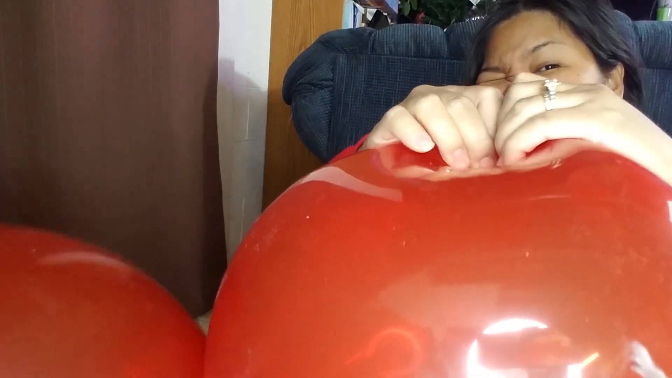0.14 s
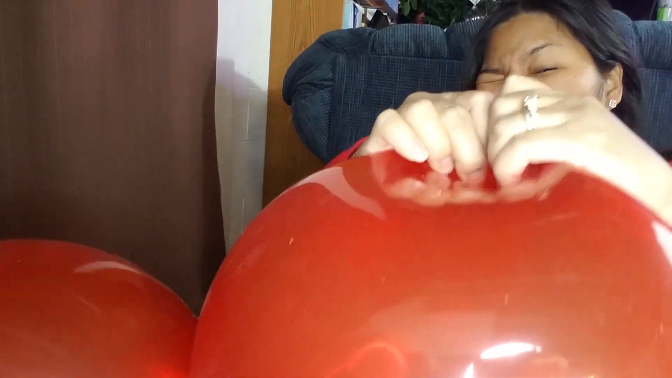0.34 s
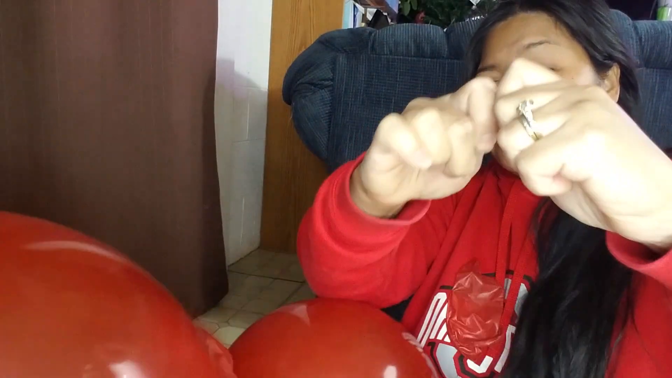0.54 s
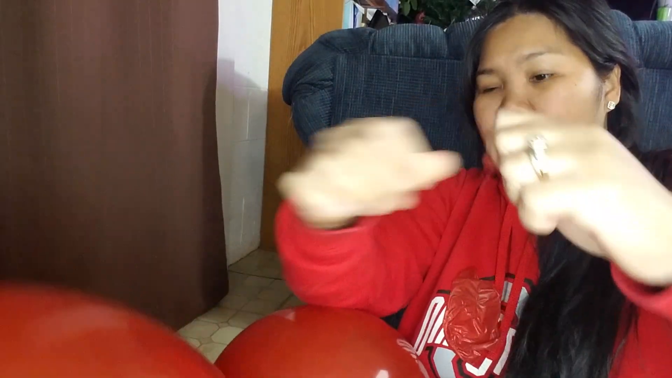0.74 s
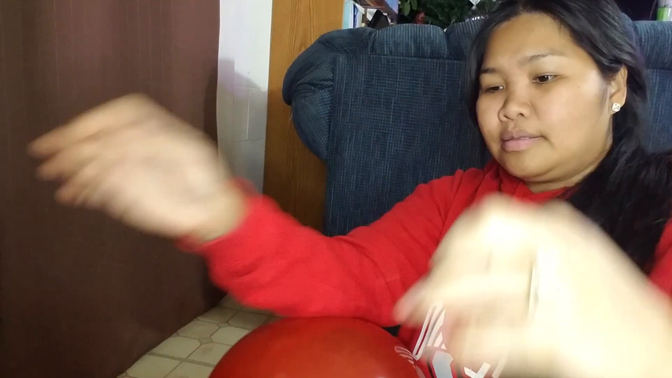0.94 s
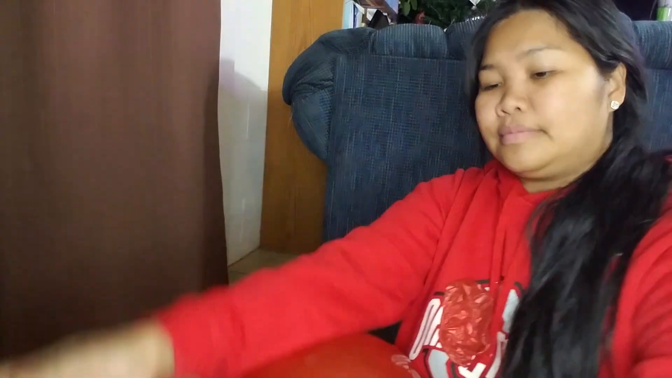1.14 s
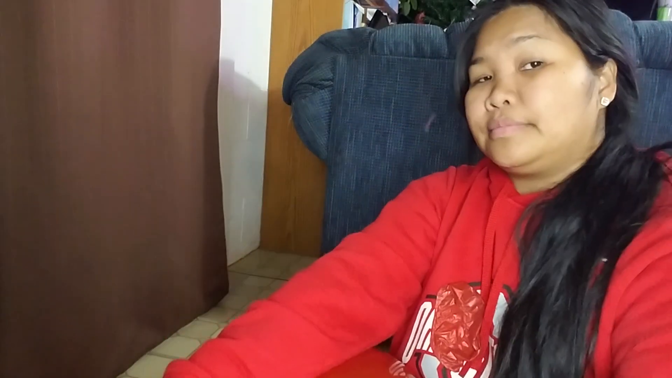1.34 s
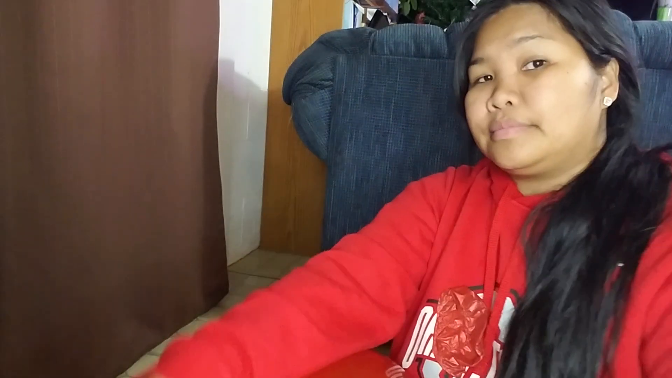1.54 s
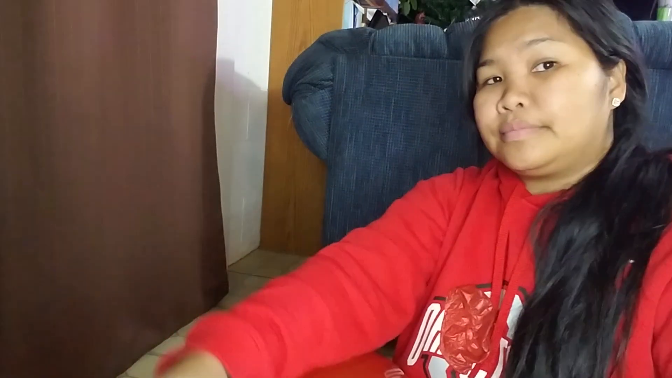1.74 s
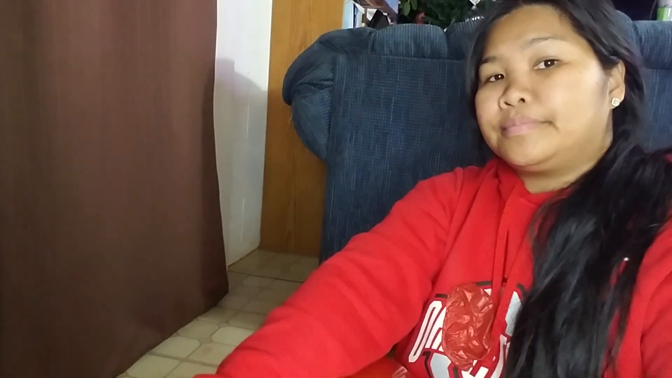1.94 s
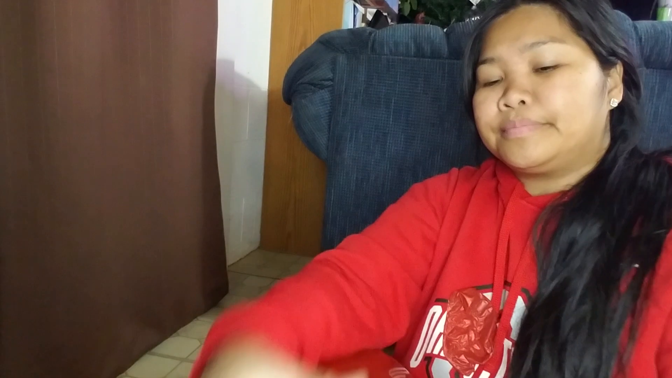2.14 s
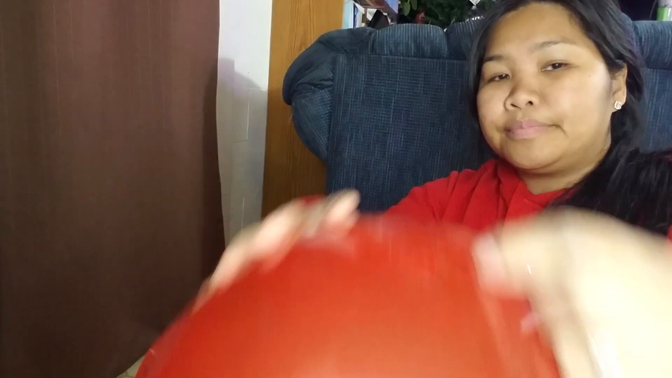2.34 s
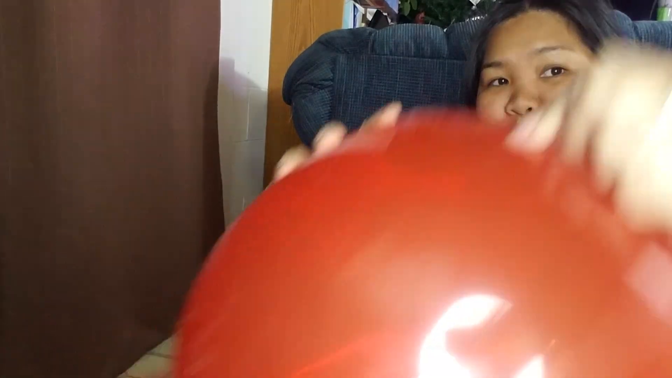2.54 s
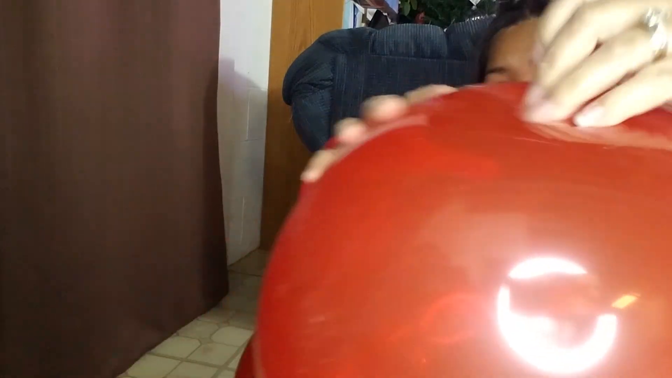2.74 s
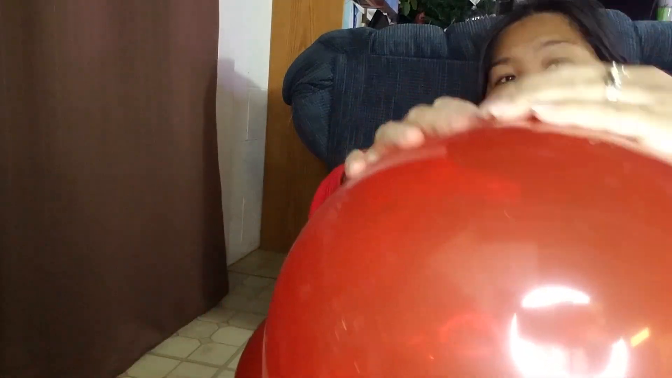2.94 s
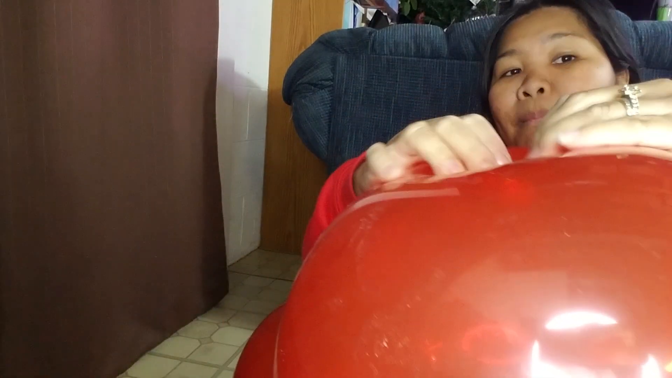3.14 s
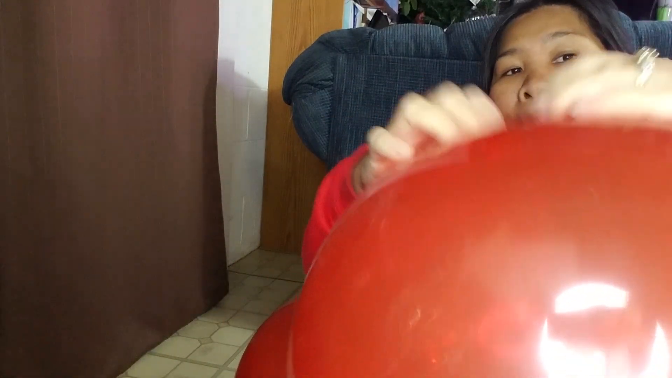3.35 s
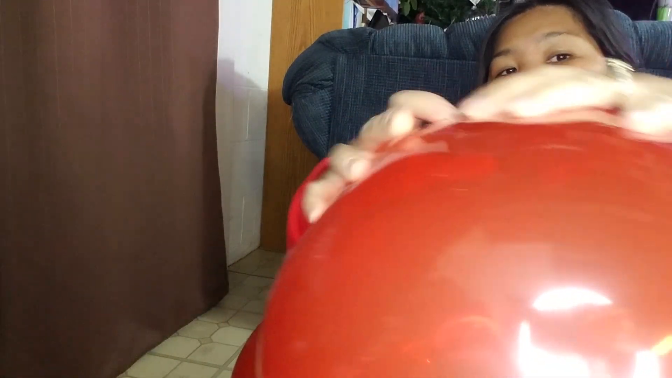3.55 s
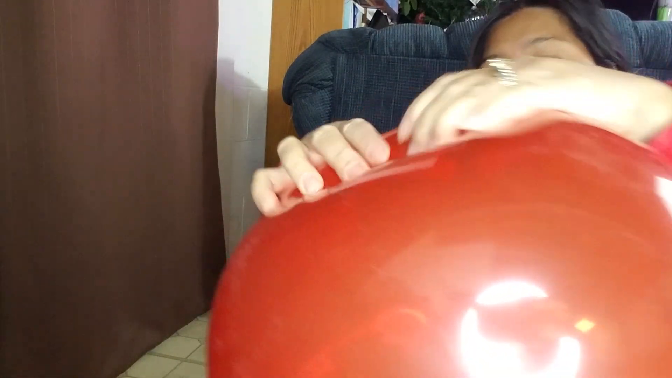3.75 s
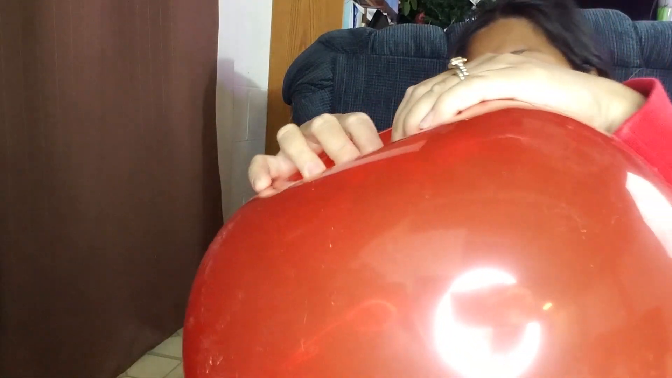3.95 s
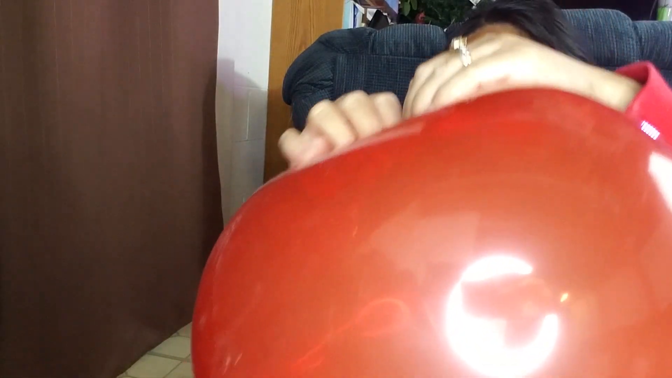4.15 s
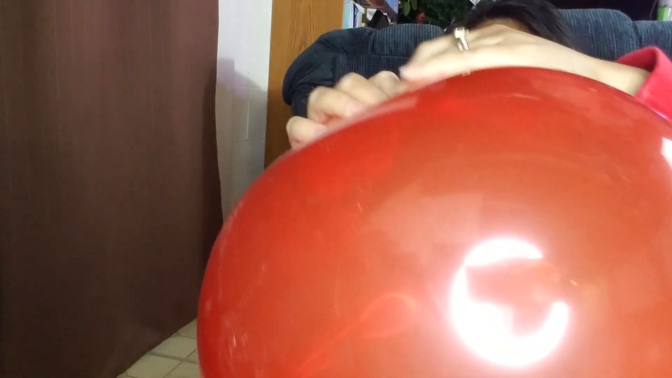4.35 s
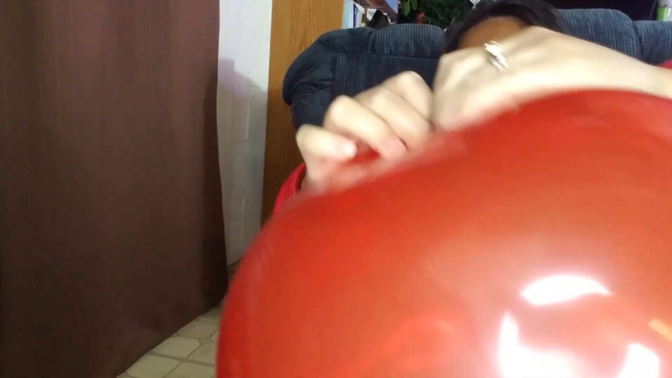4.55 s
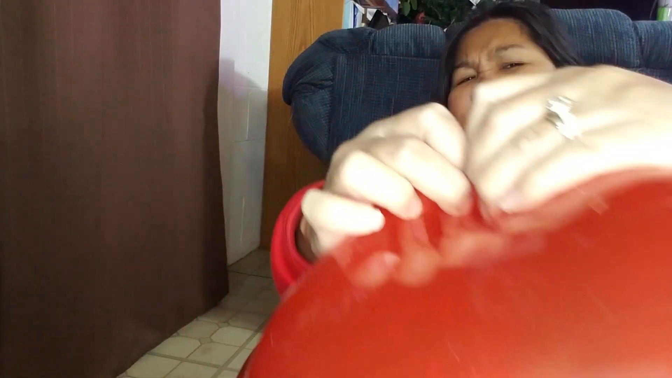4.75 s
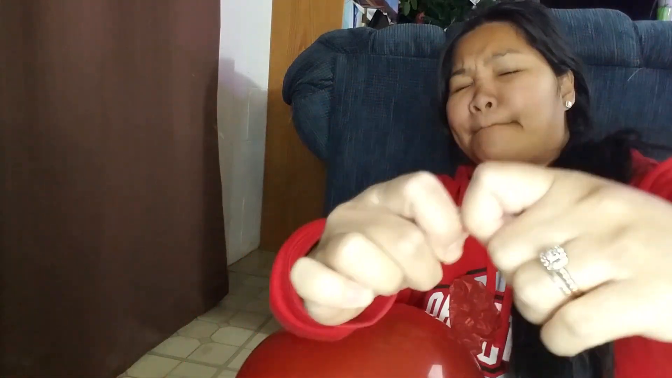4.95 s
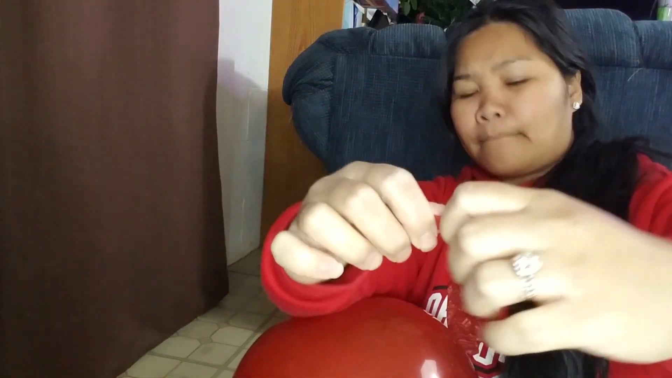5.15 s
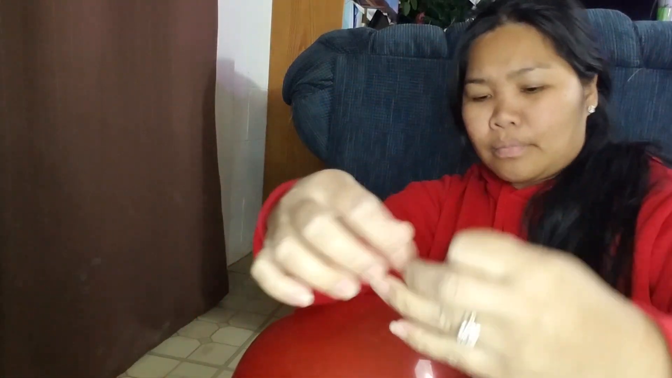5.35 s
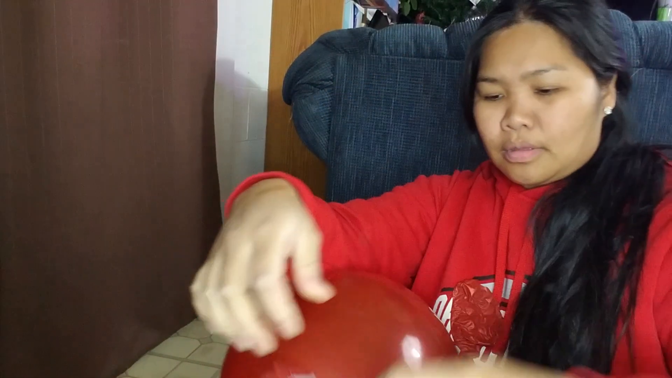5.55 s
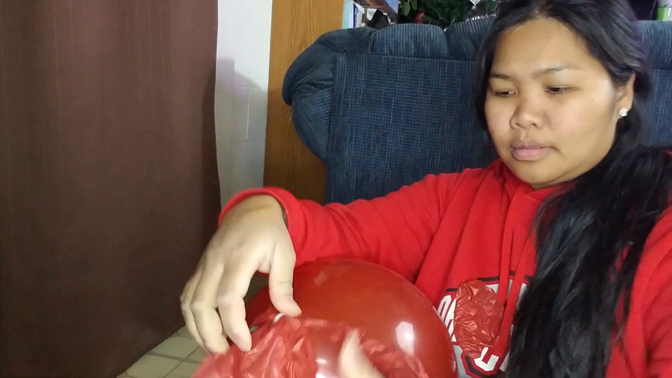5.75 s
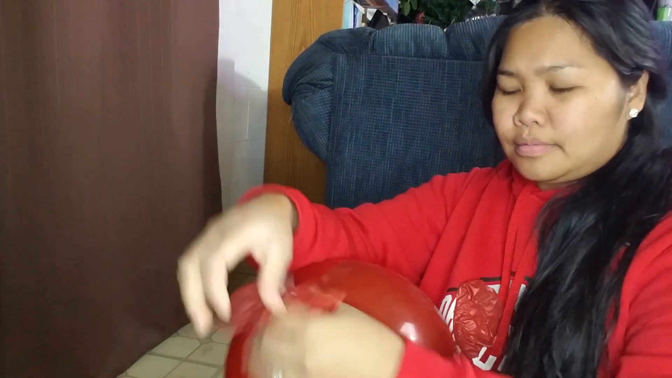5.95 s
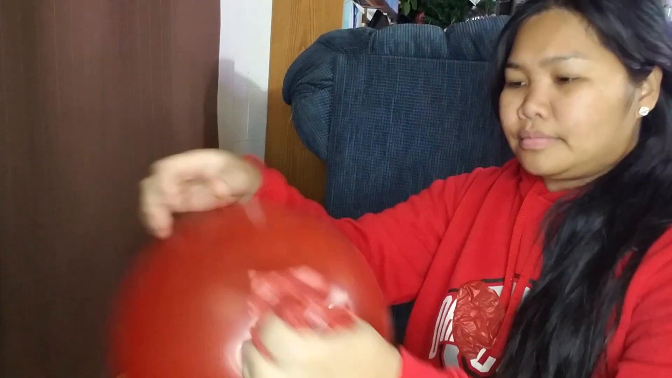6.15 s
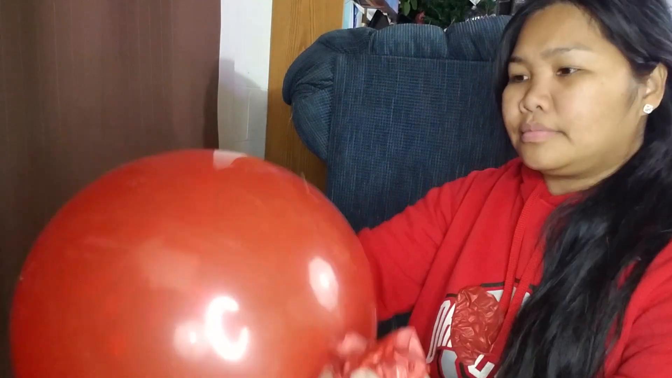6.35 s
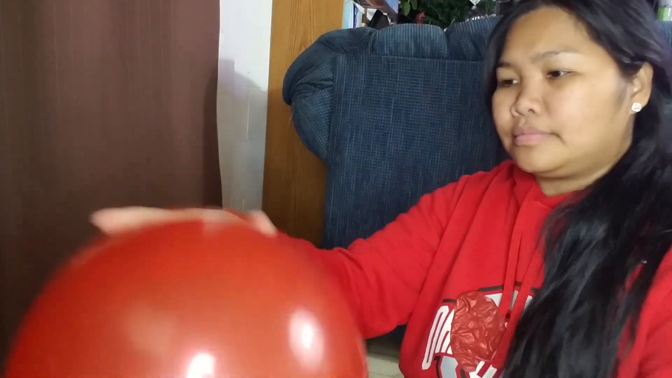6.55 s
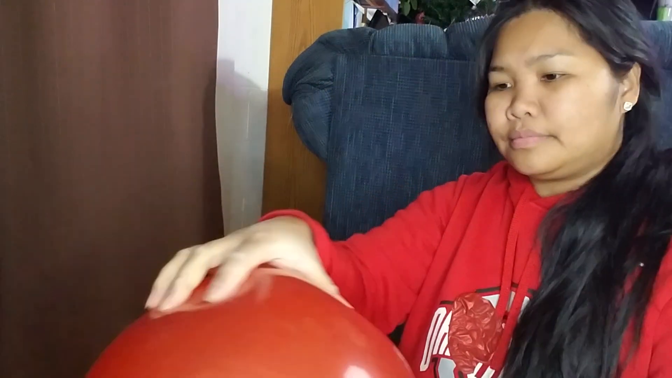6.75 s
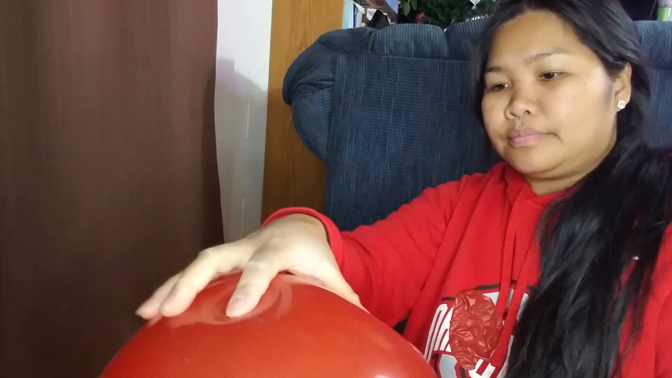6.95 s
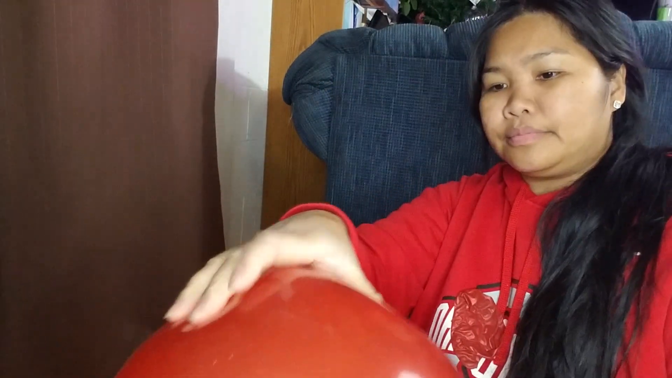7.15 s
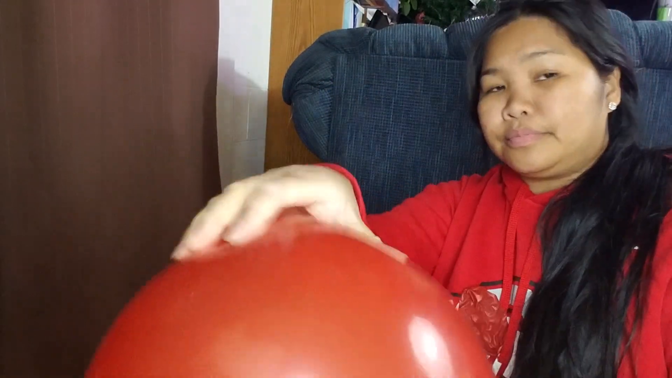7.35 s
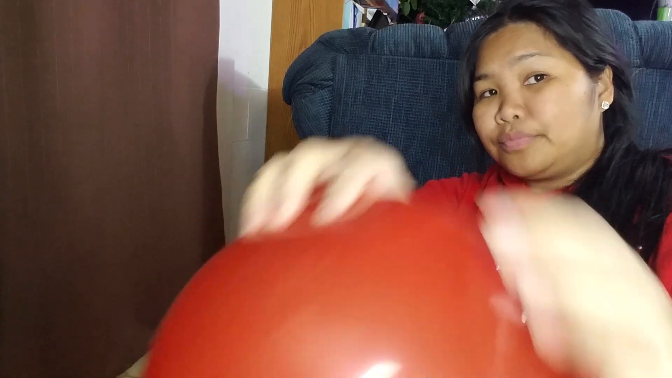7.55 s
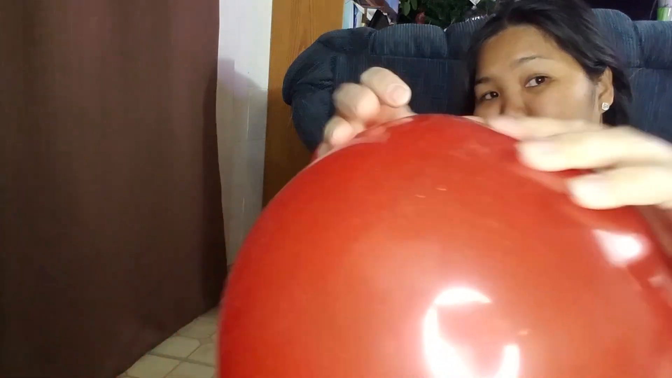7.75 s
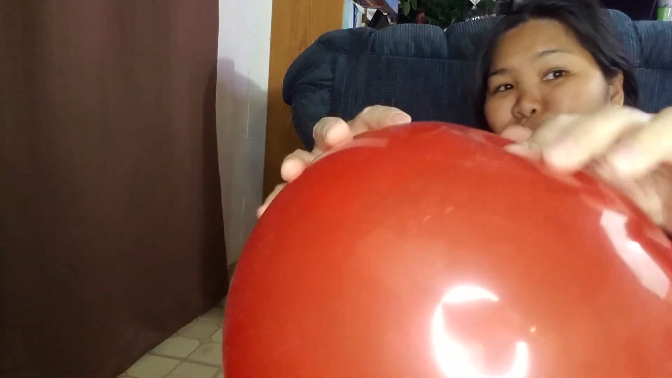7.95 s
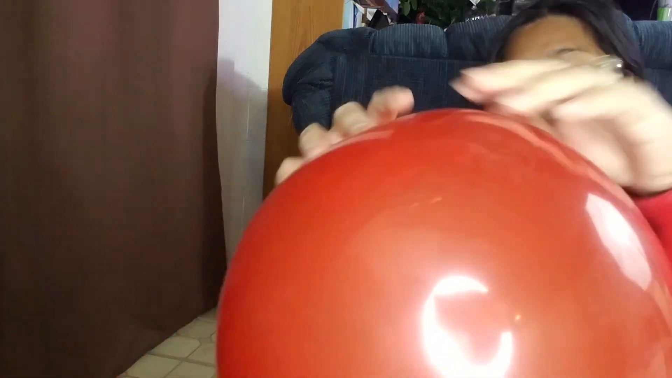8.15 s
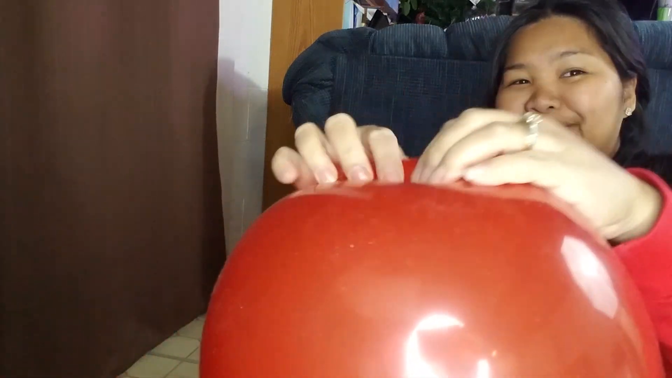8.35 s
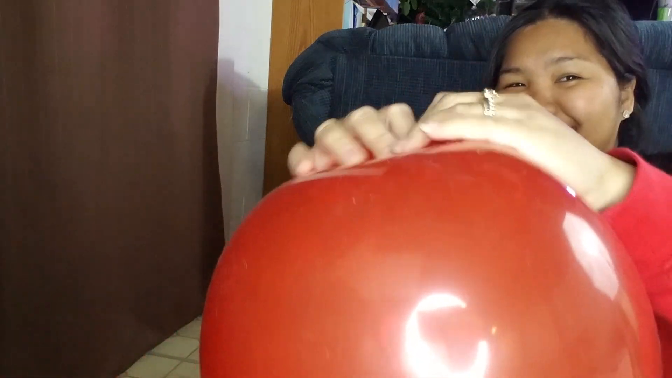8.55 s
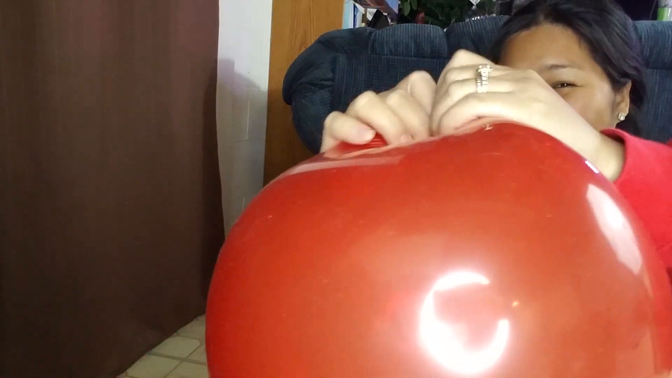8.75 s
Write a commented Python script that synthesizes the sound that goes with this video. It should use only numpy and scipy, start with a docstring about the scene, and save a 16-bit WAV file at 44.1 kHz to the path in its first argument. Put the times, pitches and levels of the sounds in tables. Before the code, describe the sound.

Stuttering high latex squeaks lead straight to a loud pop, with bassy wind on the right side afterwards. Soft rubbing grows into fierce scraping and ticking, eases into creaks, and ends in a second, boomier bang. Following a lull, palms drum and rub a new balloon, with sharp snaps. Close phone pickup, short room tail, faint hum.

```python
"""Taut latex balloons squeak, tick and rumble under rubbing, digging hands; two balloons burst.
Nails stick and slip on the latex: each slip ticks, rattles the skin and drums the air inside; countless tiny ones blur.
Palms bump out soft tones. The bursts crack, boom, overload the phone and die away in a small furnished room.
Air from the first burst buffets the right port. A faint low hum lies under everything."""
import sys
import numpy as np
from scipy import signal
from scipy.fft import rfft, irfft, next_fast_len
from scipy.io import wavfile

SR = 44100
rng = np.random.default_rng(int(sys.argv[2]) if len(sys.argv) > 2 else 0)


def generate_wav(signal):
    """Clip the signal to [-1, 1] and save it as 16-bit WAV at the path in sys.argv[1]."""
    frames = np.transpose(np.atleast_2d(signal))
    scaled = np.clip(frames, -1, 1) * 32767
    pcm = np.round(scaled).astype(np.int16)
    wavfile.write(sys.argv[1], SR, pcm)


N = 387638

# air and latex of a balloon: pitch_hz, width_hz, relative_level_db
DRUM = [(250, 86, -1.5), (382, 100, 2), (470, 68, 3.5), (606, 270, -3)]
# latex near the finger, at tautness 1: pitch_hz, width_hz, relative_level_db
SKIN = [(1015, 700, 0.5), (1480, 700, 2), (2110, 990, -0.5)]
# a loosely held balloon moving as a whole: pitch_hz, width_hz, relative_level_db
WOBBLE = [(65.5, 92, -10), (136, 110, -3.5)]


def undb(db):
    """Decibels to amplitude."""
    return 10 ** (np.asarray(db) / 20)


def unit(x):
    """Scales a sound to an RMS of one."""
    return x / np.sqrt(np.mean(x ** 2))


def low(x, hz):
    """Second-order low-pass."""
    return signal.sosfilt(signal.butter(2, hz, fs=SR, output="sos"), x)


def high(x, hz):
    """Second-order high-pass."""
    return signal.sosfilt(signal.butter(2, hz, "high", fs=SR, output="sos"), x)


def ring(x, modes):
    """Sum of two-pole resonances with alternating signs."""
    out = 0
    for k, (hz, width_hz, db) in enumerate(modes):
        b, a = signal.iirpeak(hz, hz / width_hz, SR)
        out = out + (-1) ** k * undb(db) * signal.lfilter(b, a, x)
    return out


def colour(x, spectrum):
    """Weights a sound by (Hz, dB) points on a log frequency axis."""
    hz, db = np.transpose(spectrum)
    size = next_fast_len(x.shape[1])
    axis = np.fft.rfftfreq(size, 1 / SR) + 1
    gain = undb(np.interp(np.log(axis), np.log(hz), db))
    return irfft(rfft(x, size) * gain, size)[:, :x.shape[1]]


def pair(size, apart_hz):
    """Noise for two ports: mostly alike in the bass, unrelated in the treble."""
    mid, side, room = rng.standard_normal((3, size))
    difference = high(side, apart_hz) + 0.26 * room
    return (mid + difference * np.array([[1], [-1]])) / np.sqrt(2)


def strikes(s, db):
    """An impulse of the given size at each time."""
    return np.bincount((np.asarray(s) * SR).astype(int), undb(db), N)[:N]


def fade(x, t60):
    """Each impulse grows an exponential tail that falls 60 dB in t60 seconds."""
    return signal.lfilter([1], [1, -np.exp(-np.log(1000) / (t60 * SR))], x)


def grains(per_s, spread_db, t60):
    """Envelope of randomly timed, unequal, fading grains."""
    starts = rng.random(N) < per_s / SR
    sizes = undb(spread_db * rng.exponential(size=N))
    return fade(starts * sizes, t60)


def echo(x, size=22050):
    """Diffuse room tail: noise in which every frequency dies at its own pace."""
    # decay of the furnished room: frequency_hz, t60_s
    room_decay = [(60, 0.4), (250, 0.26), (1000, 0.27), (16000, 0.19)]
    decay_hz, decay_s = np.transpose(room_decay)
    hz, t, cells = signal.stft(pair(size, 900), SR, nperseg=256)
    t60 = np.interp(np.log(hz + 1), np.log(decay_hz), decay_s)
    rounds = t / t60[:, None]
    # the lower middle lingers from the next room
    linger = undb(-34 - 24 * rounds) * (hz[:, None] < 1500)
    fall = undb(-60 * rounds) + linger
    tail = signal.istft(cells * fall, SR, nperseg=256)[1]
    tail = tail / np.sqrt(np.sum(tail ** 2) / 2)
    return signal.fftconvolve(x, tail, axes=1)[:, :N]


def hum():
    """Steady coloured noise, strongest in the bass, is heard as a faint low hum."""
    # spectrum: frequency_hz, relative_level_db per Hz
    hum_spectrum = [(24, -44), (60, -7.5), (95, -5), (120, 14), (150, -4.5), (450, -3), (900, -20),
                    (5870, -20), (10200, -4), (15500, -18)]
    level_db = -74  # RMS ahead of the microphone
    return undb(level_db) * unit(colour(pair(N, 800), hum_spectrum))


def layer_powers(hiss_db, drum_db):
    """Powers of hiss, rustle and drum: the skin rustles more when a broad palm also drums the balloon."""
    offsets_db = np.array([-8.0 + 0 * drum_db, 0.32 * drum_db - 5.0, drum_db - 7.0])
    return undb(hiss_db + offsets_db) ** 2


def pressure():
    """Amplitudes of hiss, rustle and drum: steady contact plus every stroke, added in power."""
    # hands resting and creeping on latex: time_s, relative_nail_hiss_db, relative_drum_minus_hiss_db
    contact = [(0, -37, 7.5), (.38, -39, -2.5), (0.431, -71.5, 11.5), (1.19, -78, 1.5), (1.399, -52, 5.5),
               (2.0, -40.5, -17), (3.47, -39, 1), (3.525, -55, 12), (3.565, -39, 2.5), (4.411, -69.5, 16.5),
               (4.78, -41.5, 5), (4.85, -77.5, 16), (5.85, -65.5, 9.5), (6.1, -43.5, -11), (6.7, -47, 11.5),
               (7.699, -87, 4), (8.79, -49, 5)]
    # a hand strokes the latex: peak_s, rise_s, fall_s, relative_nail_hiss_db, relative_drum_minus_hiss_db
    hand_strokes = [(.686, .02, 0.023, -50.5, -24), (1.3, 0.027, 0.05, -52, -2.5),
                    (1.549, 0.19, 0.1, -44.5, 2.5), (1.7, 0.024, 0.027, -35, -2),
                    (1.89, 0.054, 0.13, -36.5, 4.5), (2.275, 0.33, 0.14, -31.5, -4.5),
                    (2.552, 0.065, 0.12, -34.5, 2.5), (2.719, 0.07, 0.058, -36.5, 3),
                    (2.91, 0.074, 0.078, -35, 3.5), (3.151, 0.054, 0.19, -30, -34),
                    (3.412, 0.034, 0.028, -23, -13.5), (4.037, 0.089, 0.17, -18.5, -8.5),
                    (4.3, 0.094, 0.03, -17.5, -14.5), (4.53, 0.075, 0.08, -40, 12.5),
                    (5.947, 0.045, 0.069, -41, 2), (6.342, 0.12, 0.038, -54, 21.5),
                    (6.576, 0.025, 0.041, -28.5, 7.5), (6.73, 0.014, 0.085, -30.5, 9.5),
                    (6.914, 0.076, 0.33, -33.5, -6), (7.123, 0.089, 0.12, -35.5, 10),
                    (7.297, 0.024, 0.097, -33, 8.5), (7.618, 0.091, 0.058, -30.5, 9.5),
                    (7.792, 0.075, 0.22, -39, 12), (8.019, 0.056, 0.059, -31, 16),
                    (8.31, 0.022, 0.45, -32, 8.5), (8.436, 0.083, 0.041, -22, 3),
                    (8.63, 0.3, 0.047, -30.5, 10.5), (8.777, 0.12, .2, -34.5, 13.5)]
    drop_db = 10  # a stroke is this much weaker one rise before and one fall after its peak
    t = np.arange(N) / SR
    s, *columns = np.transpose(contact)
    power = layer_powers(*(np.interp(t, s, column) for column in columns))
    for peak, rise, fall, hiss_db, drum_db in hand_strokes:
        span = slice(max(int((peak - 4 * rise) * SR), 0), int((peak + 4 * fall) * SR))
        late = t[span] - peak
        swell = undb(-drop_db * np.where(late < 0, -late / rise, late / fall))
        power[:, span] += layer_powers(hiss_db, drum_db)[:, None] * swell ** 2
    return np.sqrt(power)


def rubbing():
    """Countless tiny slips blur into a grainy hiss, rustle, rumble and wobble."""
    # how much a loosely held balloon wobbles as a whole: time_s, wobble_minus_rumble_db
    deep = [(0, 2.5), (2, -6.5), (4.6, 4), (7.3, 0), (8.79, -10.5)]
    nails, skin, palm = pressure()
    deep_db = np.interp(np.arange(N) / SR, *np.transpose(deep))
    grain = grains(900, 1.2, 0.033) + 1.3
    hiss = unit(high(grain * rng.standard_normal((2, N)), 1800))

    creep = pair(N, 1400)
    rustle = 0
    for mode in SKIN:  # each resonance creaks in its own grains
        creaks = grains(120, 2.8, .04) + .7
        rustle = rustle + ring(creaks * creep, [mode])
    rustle = unit(rustle)

    lumps = grains(120, 3.2, 0.09) + .8
    rumble = unit(low(ring(lumps * pair(N, 780), DRUM), 870))
    wobble = unit(low(ring(lumps * pair(N, 300), WOBBLE), 340))
    return nails * hiss + skin * rustle + palm * (rumble + undb(deep_db) * wobble)


def slip(s, db, skin_db, taut):
    """A rough tick of the nail, a rattle of the skin, a kick to the air inside; tauter latex rings higher."""
    # latex pinched under a nail, at tautness 1: pitch_hz, width_hz, relative_level_db
    nail = [(2900, 1300, 1.5), (5100, 3600, -1.5)]
    scatter_db = 4  # every slip rings each nail resonance with its own strength; the skin scatters half as much
    across_s = .003  # delay of the echo from the far wall of the balloon
    span = slice(int(min(s) * SR), int((max(s) + .1) * SR))

    def hits(level_db):
        return strikes(s, level_db)[span]

    def tuned(mode):
        hz, width_hz, mode_db = mode
        return [(hz * taut, width_hz * taut, mode_db)]

    tick = hits(db)
    shake = pair(len(tick), 2000)
    # the left port is a little further off
    snap = .7 * np.array([np.roll(tick, 2), tick]) + .17 * fade(tick, .007) * shake
    snap = snap + .4 * np.roll(snap, int(across_s * SR), 1)

    colours = scatter_db * rng.standard_normal((len(SKIN) + len(nail), len(s)))
    skin_colours, nail_colours = colours[:len(SKIN)], colours[len(SKIN):]
    pinch = sum(ring(hits(db + c), tuned(mode)) for c, mode in zip(nail_colours, nail))
    ticks = high(snap, 2000 * taut) + .7 * pinch

    rattle = 0
    for c, mode in zip(skin_colours, SKIN):
        push = hits(db + skin_db + .5 * c)
        rough = push + .045 * fade(push, .015) * shake
        rattle = rattle + ring(ring(rough, tuned(mode)), tuned(mode))
    rattle = low(rattle, 2500)

    # the more latex a slip moves, the harder it kicks the air inside; taut latex moves little
    shove = signal.lfilter([1], [1, -.9], hits(db + 1.2 * skin_db))
    kick = low(ring(shove, [*DRUM, *WOBBLE]), 600) / taut ** 2
    out = np.zeros((2, N))
    out[:, span] = undb(2) * ticks + undb(20.5) * rattle + undb(5.5) * kick
    return out


def slips():
    """Lone slips, and stick-slip runs of scattered spacing, each run on latex of its own tautness."""
    # lone slips: time_s, relative_tick_db, relative_skin_rattle_minus_tick_db
    lone_slips = [(0.083, -64, 27), (0.1272, -41, 16), (0.168, -41, 15), (1.213, -50, -2),
                  (3.8456, -11.5, -5), (3.888, -6.5, -9.5), (3.925, -6, -7.5), (3.9451, -11, -1.5),
                  (3.97, -6.5, -8), (3.991, -9, -7), (4.188, -12, -7.5), (4.2062, -3, -12.5),
                  (4.388, -15, -6.5), (5.3, -40.5, -33), (6.568, -0.5, -8.5), (6.72, -3.5, -7),
                  (6.7511, -15.5, 4), (7.151, -33, 11.5), (7.2741, -14, -8), (7.8766, -22, 8),
                  (8.1439, -22.5, 6.5), (8.335, -14, 5), (8.392, -17.5, 8.5), (8.403, -8.5, 0),
                  (8.431, -7, -5), (8.747, -11.5, 0), (8.774, -15.5, 2.5)]
    # runs of slips under a dragged finger: start_s, end_s, first_slips_per_s, last_slips_per_s,
    # first_relative_tick_db, last_relative_tick_db, relative_skin_rattle_minus_tick_db, tautness (pitch ratio)
    drags = [(0.131, 0.217, 69, 140, -22, -14, -32, 3.5), (0.213, 0.389, 335, 360, -18.5, -21.5, -16, 2.8),
             (2.649, 2.74, 82, 107, -31.5, -37, 7, 1.4), (4.007, 4.047, 420, 440, -6.5, -8, -14.5, 1.01),
             (4.056, 4.162, 150, 110, -7.5, -8.5, -8, 0.9), (4.2518, 4.313, 152, 500, -8, -9.5, -19, 1.9),
             (4.4918, 4.534, 90, 117, -31.5, -27.5, 11.5, 1.53),
             (4.5503, 4.601, 58, 68, -28, -26.5, 12, 1.6), (6.722, 6.764, 323, 510, -30.5, -23, 9.5, 1.01),
             (7.769, 7.806, 253, 256, -28.5, -15, 0.5, 0.97), (7.991, 8.028, 297, 236, -30, -28, 12.5, 1.1),
             (8.072, 8.113, 405, 550, -16, -13.5, 0.5, 0.99),
             (8.265, 8.335, 165, 146, -36.5, -26, 11, 0.91)]
    spacing_scatter, size_scatter_db = .07, 1.5  # spacing is a log ratio
    out = slip(*np.transpose(lone_slips), 0.95)
    for start, end, first, last, first_db, last_db, skin_db, taut in drags:
        spacing_chance, size_chance = rng.standard_normal((2, 100))
        points = len(spacing_chance)
        # slips due so far, along the run
        turns = np.cumsum(np.linspace(first, last, points)) * (end - start) / points
        wanted = np.cumsum(np.exp(spacing_scatter * spacing_chance)) - 1
        # slips past the end of the run get time 0 and are dropped
        s = np.interp(wanted, turns, np.linspace(start, end, points), right=0)
        db = np.interp(s, [start, end], [first_db, last_db]) + size_scatter_db * size_chance
        out += slip(s[s > 0], db[s > 0], skin_db, taut)
    return out


def bursts(size=40000, count=400):
    """The latex tears in milliseconds; the freed air cracks, fills the room and, a little later, booms in its low modes."""
    # burst balloons: time_s, relative_crack_db, relative_boom_minus_crack_db, boom_tilt_db per octave
    pops = [(0.3968, 6, -0.5, -5), (4.81, 11, -1.5, 7.5)]
    # low room modes: pitch_hz, relative_level_db before the tilt, t60_s
    room_modes = [(240, 6, 0.16), (310, 2.5, 0.19), (445, 0.5, 0.12), (528, -3.5, 0.23), (604, -2.5, 0.16),
                  (126, -12.5, 0.4)]
    # spectrum of tearing latex: frequency_hz, relative_level_db per Hz
    tear_spectrum = [(40, -8.5), (250, 11.5), (600, 5.5), (1500, 0.5), (16000, -10.5)]
    out, t = np.zeros((2, N)), (np.arange(size) - count) / SR
    for s, crack_db, boom_db, tilt_db in pops:
        crack = 1. * (t == 0)
        tear = high(fade(crack, 0.033) * unit(colour(pair(size, 530), tear_spectrum)), 200)
        late = (t - .004).clip(0)
        boom = 0
        for hz, db, t60 in room_modes:
            level_db = db + tilt_db * np.log2(hz / 350) - 60 * late / t60
            boom = boom + undb(level_db) * np.sin(2 * np.pi * hz * late)
        room = echo(colour(np.array([crack, crack]), tear_spectrum))[:, :size]
        burst = low(crack, 5400) + tear + undb(20.5) * room + undb(boom_db - 20.5) * boom
        out[:, int(s * SR) - count:][:, :size] += undb(crack_db) * burst
    return out


def gust():
    """Air from the first burst makes turbulent bass on the right port only: a lump, then a fading trail."""
    # buffet: start_s, lump_db, lump_length_s, trail_db, trail_s (time constant), top_hz
    buffet = (.578, -23, .06, -36, .09, 300)
    s, lump_db, length, trail_db, trail_s, top_hz = buffet
    t = (np.arange(N) / SR - s).clip(0)
    lump = undb(lump_db) * np.sqrt(np.sin(np.pi * (t / length).clip(0, 1)).clip(0))
    trail = undb(trail_db) * (t > 0) * np.exp(-t / trail_s)
    turbulence = low(low(rng.standard_normal(N), top_hz), top_hz)
    return np.array([[0], [1]]) * (lump + trail) * unit(high(turbulence, 50))


def bumps():
    """A palm's soft push swells a clear tone of the squeezed air, with a rough edge of latex in and above it."""
    # palms bump a balloon: start_s, peak_db, pitch_hz
    pushes = [(1.876, -24.5, 369), (2.244, -25.5, 460), (2.874, -26.5, 243), (4.503, -17, 107),
              (6.128, -23.5, 387.3), (6.166, -29.5, 464), (6.218, -23, 429), (6.291, -21.5, 426),
              (7.11, -34, 307), (7.542, -19, 207), (7.611, -21.5, 530), (7.773, -17.5, 343),
              (7.985, -15.5, 604)]
    out, t = np.zeros((2, N)), np.arange(6000) / SR
    for s, db, hz in pushes:
        swell = t * np.exp(-t / 0.009)
        # the pitch strays by 6 percent RMS
        wander = np.cumsum(unit(low(rng.standard_normal(len(t)), 60))) * .06 * hz / SR
        edge_modes = [(hz, .2 * hz, 0), (2.3 * hz, .4 * hz, -6), (3.4 * hz, .5 * hz, -7)]
        edge = unit(ring(pair(len(t), 900), edge_modes))
        tone = swell * (np.sin(2 * np.pi * (hz * t + wander)) + .6 * edge)
        out[:, int(s * SR):][:, :len(t)] += undb(db) * tone / np.abs(tone).max()
    return out


def scene():
    """Slips and bumps with their room echo, over rubbing, bursts, gust and hum."""
    near = slips() + bumps()
    room = undb(-10) * echo(near)
    return near + room + rubbing() + bursts() + gust() + hum()


def record(dry):
    """The port lifts the treble and dulls the very top, the converter clips the bursts, the top is cut."""
    port = [(8403, 1140, 12.5)]  # resonance of the microphone port: Hz, width Hz, dB
    top_hz = 15700
    heard = low(dry + ring(dry, port), 12500)
    clipped = np.clip(heard, -1, 1)
    top = signal.ellip(6, .2, 30, top_hz, fs=SR, output="sos")
    return np.clip(signal.sosfilt(top, clipped), -1, 1)


dry = scene()
out = record(dry)
generate_wav(out)
```